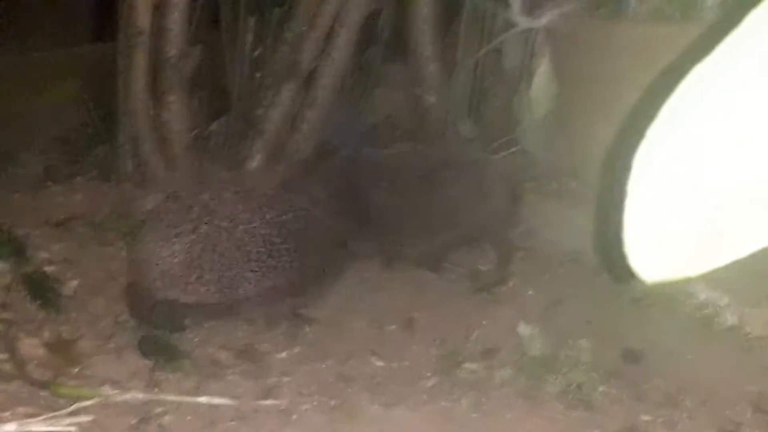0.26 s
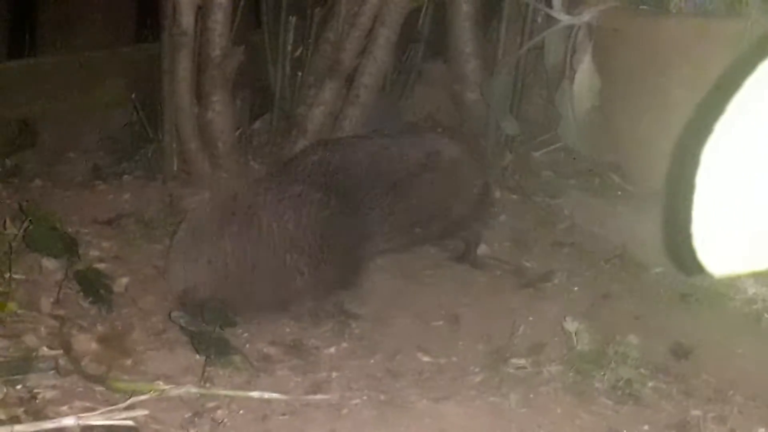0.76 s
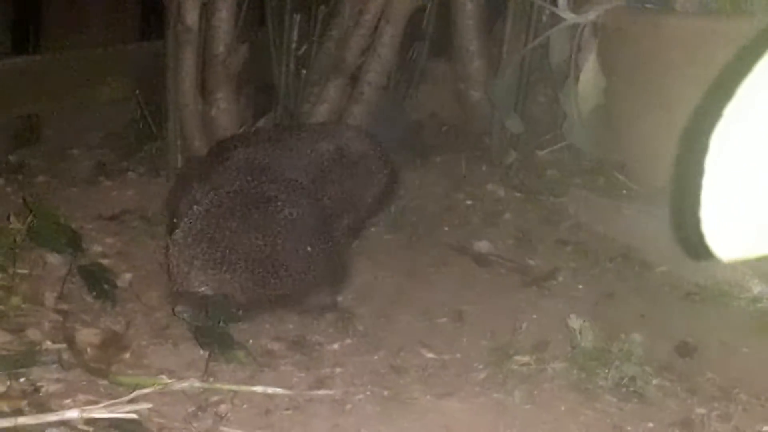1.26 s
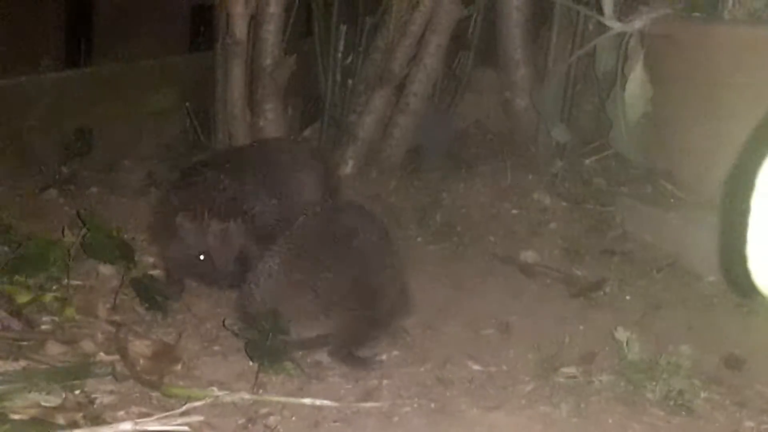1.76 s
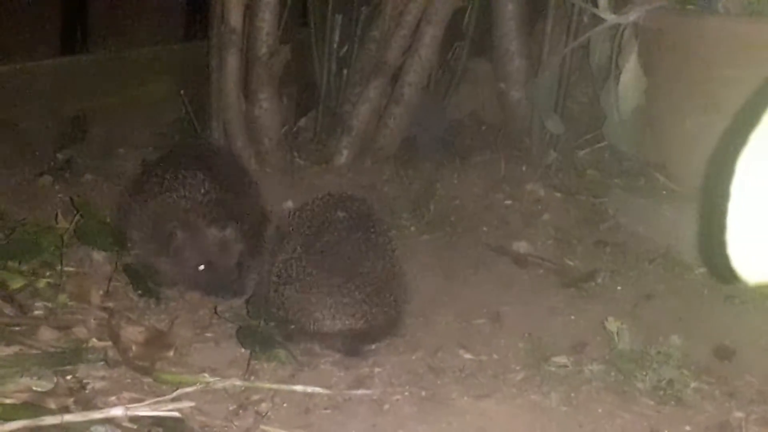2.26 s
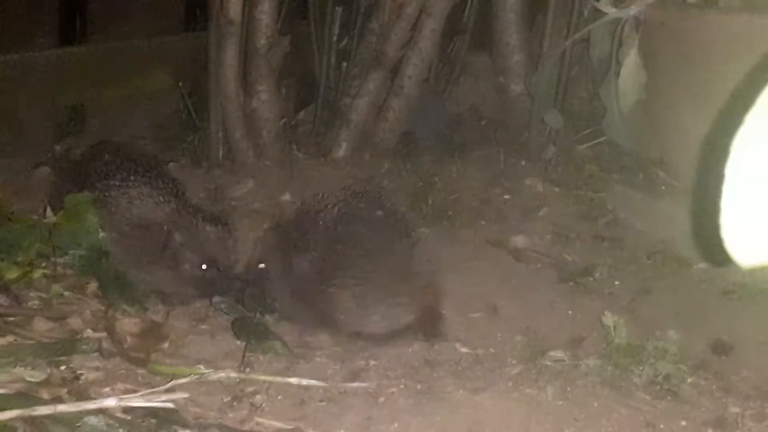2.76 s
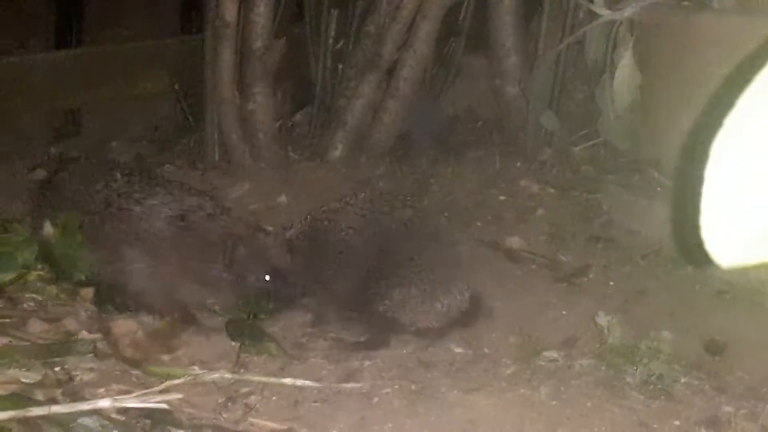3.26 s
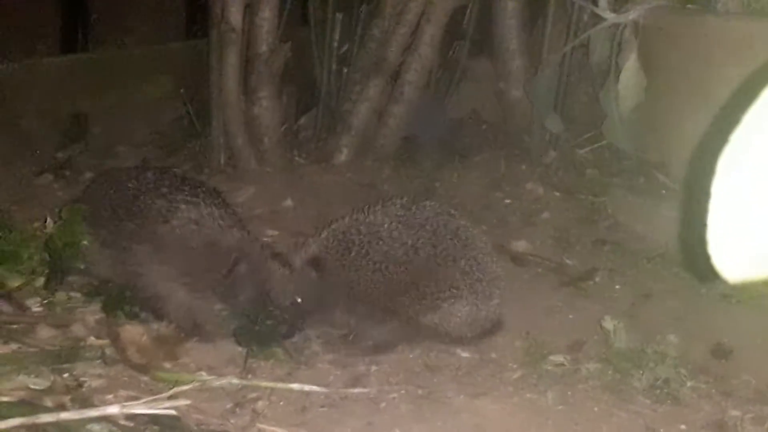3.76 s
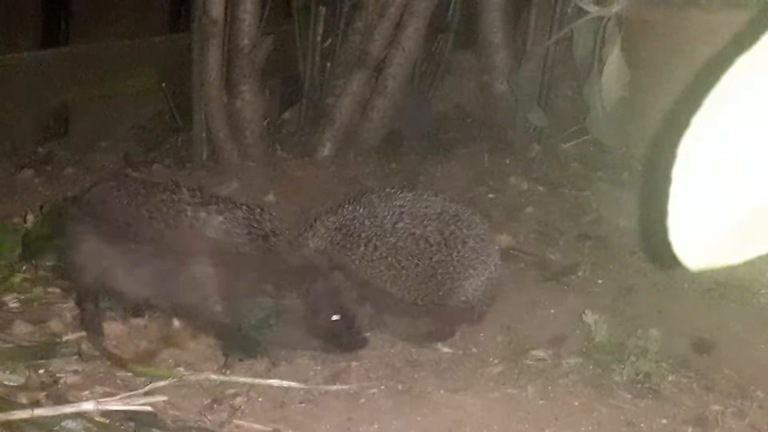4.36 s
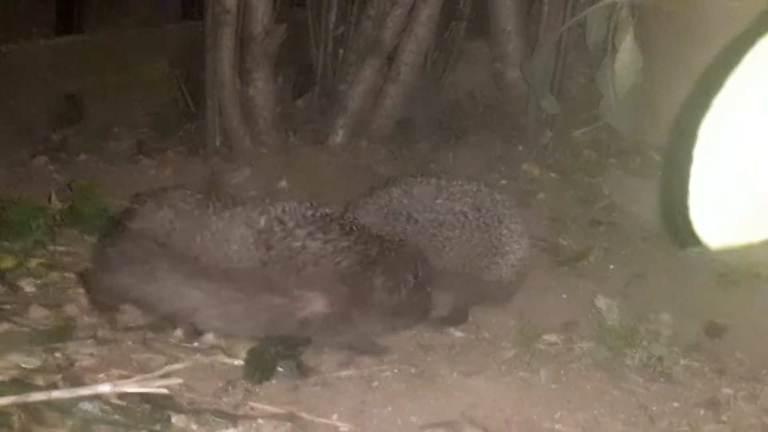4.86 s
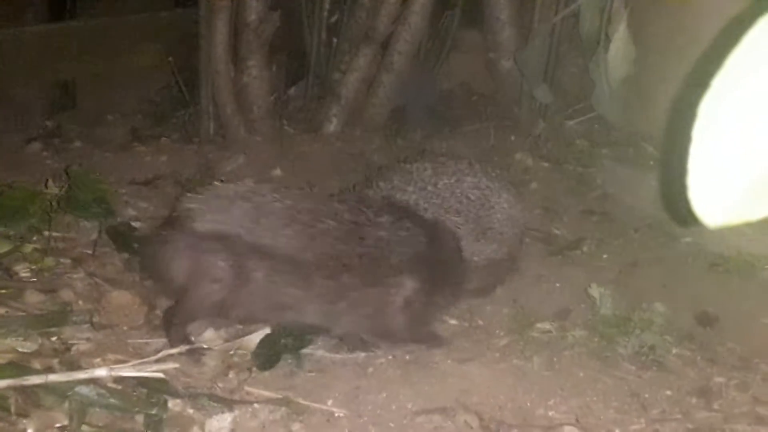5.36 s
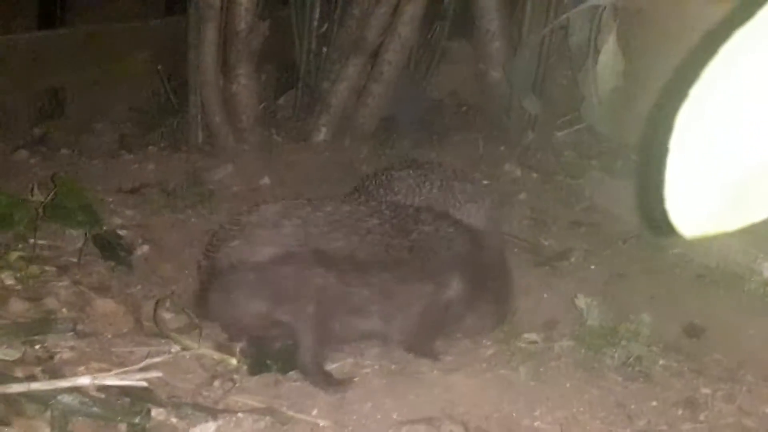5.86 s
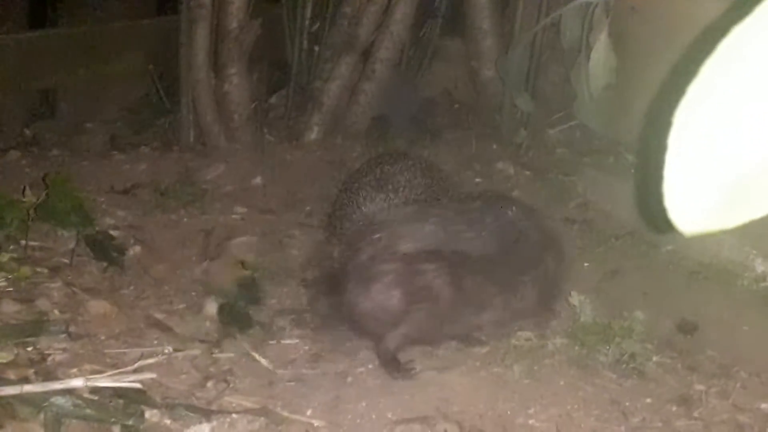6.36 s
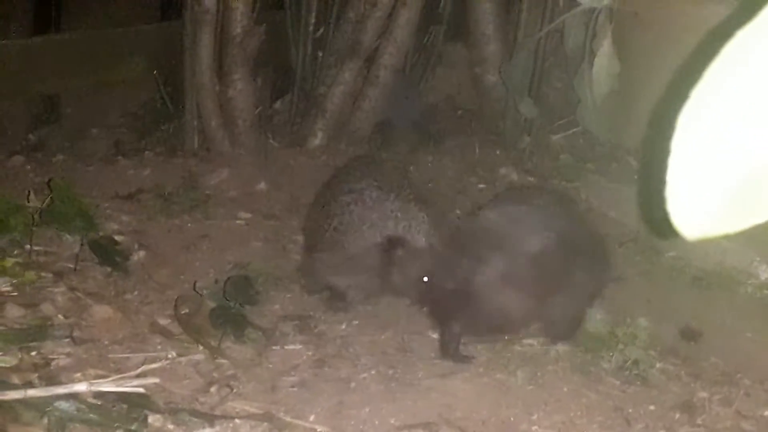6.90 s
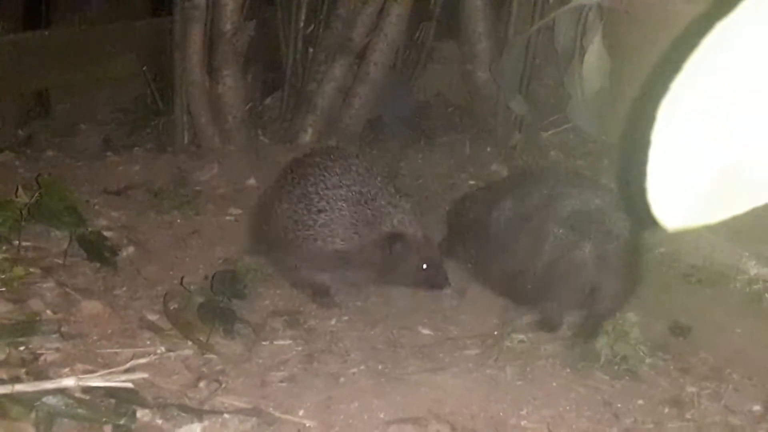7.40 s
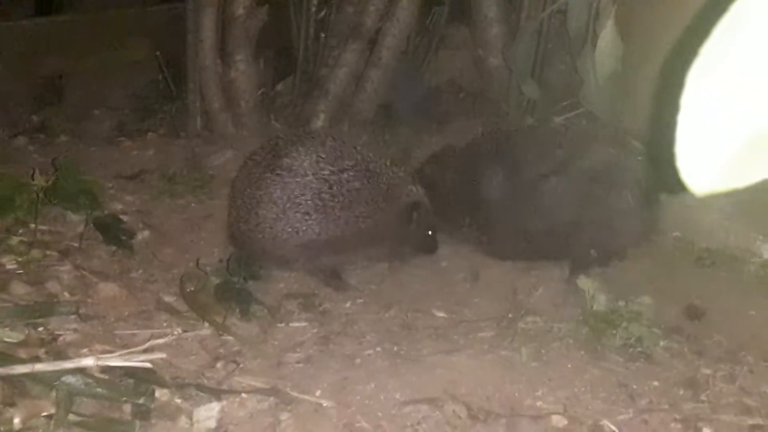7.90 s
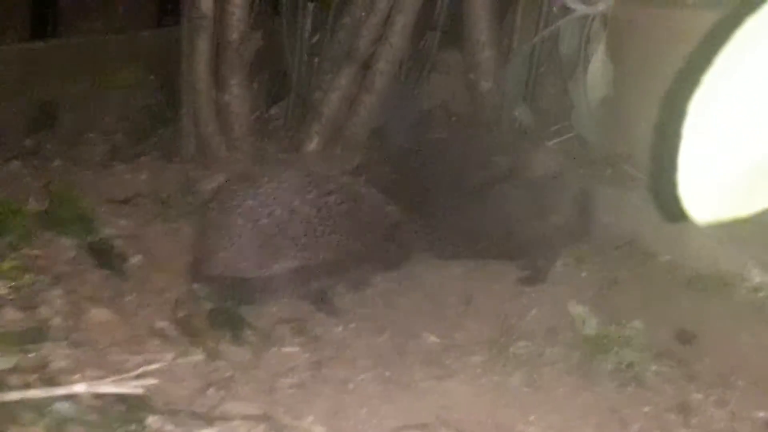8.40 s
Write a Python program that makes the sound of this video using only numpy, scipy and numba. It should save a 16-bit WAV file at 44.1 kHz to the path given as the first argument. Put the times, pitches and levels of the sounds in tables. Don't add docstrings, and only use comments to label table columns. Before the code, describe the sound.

Outdoors in a garden at night, a hedgehog about a metre from a small microphone huffs throughout, roughly three times a second. Each huff is a short burst of forced nasal air, bright and hissy around a rasping centre, with a little chesty body and a soft swell and fall. Faint leaf crackles trail the puffs. A small snap and dull pushes come near 0.7-0.8 s, and a low bump at 1.4 s. Around 3.3 s leaves rustle and twigs snap crisply. Faint whistling in-breaths appear near 3 s and 5-5.3 s. From 5.2 s the shuffling thickens, with the sharpest crack at 5.7 s. Huffs are stronger from about 6.7 s, with a light rustle near 7.9 s, and continue to the end at about 8.6 s. Far traffic rumble, a low drone and steady faint hiss lie beneath.

```python
import sys
import numpy as np
from scipy import signal
from scipy.fft import rfft, irfft
from scipy.io import wavfile
from scipy.ndimage import uniform_filter1d
from numba import njit

SR = 44100
rng = np.random.default_rng(int(sys.argv[2]) if len(sys.argv) > 2 else 0)


def linear_from_db(decibels):
    return 10 ** (np.asarray(decibels, float) / 20)


def digitize_waveform(pressure):
    field = np.atleast_2d(pressure).T
    bounded = np.clip(field, -1, 1)
    quanta = np.round(bounded * 32767).astype(np.int16)
    wavfile.write(sys.argv[1], SR, quanta)


N = 381024

# f/Hz, density/dB
TRAFFIC_SPECTRUM = [(13, -56), (22, -37), (35, -29), (49, -9), (92, -6.5), (125, -4.5), (157, -1.5),
                    (233, 0.5), (276, -4.5), (366, -5.5), (426, -14), (576, -8), (645, -8.5), (1050, -11),
                    (2000, -45.5), (2600, -84), (4400, -120)]
# t/s, level/dB
TRAFFIC_SWELL = [(0, 1), (.74, 0), (.98, -2), (1.4, 1), (2.2, -2.5), (4.9, 1), (5.4, -1), (6.7, 1.5),
                 (8.64, -1)]
# t/s, level/dB
LORRY_LEVEL = [(0, -71), (3.6, -73.5), (4.3, -63.5), (6.5, -57.5), (7.2, -99), (8.64, -59)]
# f/Hz, width/Hz, level/dB
FAN_TONES = [(62.1, 18, -67.5), (121.8, 9, -68), (243.5, 12.4, -65.5), (363.5, 8, -69)]
# t/s, level/dB, rise/(dB/s), fall/(dB/s)
LEAF_SHUFFLES = [(.002, -66.5, 900, 600), (.05, -76, 500, 50), (.785, -66, 900, 240), (2.886, -73, 300, 50),
                 (3.064, -78, 150, 70), (3.296, -54.5, 700, 900), (3.388, -67.5, 120, 700),
                 (3.62, -67, 500, 240), (4.288, -71, 70, 300), (4.352, -76, 150, 500),
                 (4.912, -83, 300, 60), (5.01, -76, 500, 500), (5.11, -70, 500, 100), (5.2, -66, 800, 550),
                 (5.33, -71, 70, 296), (5.51, -60, 90, 400), (5.548, -62, 400, 550),
                 (5.7, -44.5, 2000, 1500), (5.739, -57.5, 1500, 390), (6.27, -73.5, 500, 102),
                 (7.825, -59.5, 800, 500), (7.937, -78, 100, 650), (8.003, -85, 250, 350),
                 (8.231, -77, 900, 600), (8.525, -76, 500, 100)]
# f/Hz, density/dB
LEAF_SPECTRUM = [(940, -60), (1600, -11), (2260, -12.5), (2580, -14), (3040, -9), (3790, -16.5),
                 (4630, -15), (5150, -10.5), (7480, -30), (15800, -34)]
# t/s, peak/dB, ring f/Hz, treble share/dB, scatter share/dB
TWIG_SNAPS = [(0.044, -51, 3670, -23, -3), (0.3815, -63, 3920, -15, -18), (0.791, -45, 3950, -29, -9),
              (3.2864, -41, 3770, -24, -16), (3.2953, -39, 4000, -27, -20), (3.351, -47.5, 3800, -29, -14),
              (3.3827, -55, 3540, -21, -14), (3.6651, -59, 3590, -18, -18), (4.2543, -48.5, 3780, -22, -13),
              (5.198, -49, 3500, -27, -20), (5.446, -45, 3900, -31, -21), (5.4594, -46, 3910, -36, -21),
              (5.4765, -44, 3580, -31, -22), (5.51, -40, 3680, -29, -24), (5.691, -31.5, 3730, -16, -1),
              (5.6959, -31.5, 4460, -2, -10), (5.7402, -38, 3830, -26, -12), (7.889, -58, 3850, -15, -18),
              (7.9179, -57, 3740, -14, -18), (7.998, -62, 4070, -16, -18)]
# t/s, length/s, peak airflow/dB, crest place/(0-1)
HUFF_EVENTS = [(0.148, 0.13, -48.5, 0.39), (0.442, 0.112, -54, 0.56), (0.671, 0.08, -46, 0.52),
               (0.988, 0.12, -47.5, 0.48), (1.328, 0.12, -46.5, 0.43), (1.681, 0.12, -47.1, 0.52),
               (2.007, 0.1, -50, 0.46), (2.373, 0.11, -49.4, 0.55), (2.747, 0.11, -47.5, 0.6),
               (3.142, 0.128, -51.5, 0.51), (3.469, 0.12, -43.5, 0.58), (3.797, 0.123, -47, 0.46),
               (4.094, 0.089, -45.5, 0.54), (4.42, 0.078, -51.5, 0.56), (4.647, 0.11, -50.5, 0.6),
               (5.015, 0.083, -52.5, 0.66), (5.327, 0.11, -51, 0.44), (5.602, 0.088, -45, 0.58),
               (5.857, 0.093, -49.6, 0.46), (6.158, 0.092, -48.5, 0.58), (6.462, 0.087, -46.5, 0.52),
               (6.731, 0.11, -42.5, 0.51), (7.07, 0.11, -44.5, 0.44), (7.376, 0.1, -42, 0.41),
               (7.695, 0.11, -43.5, 0.46), (8.051, 0.11, -46.5, 0.46), (8.393, 0.11, -43, 0.56)]
# t/s, nostril f/Hz, facing camera/dB, nasal level/dB
HEAD_POSE = [(.15, 3950, 6.5, -15.5), (.46, 3700, 3, -14), (1.33, 3850, -1.5, -12.5), (1.7, 3780, -4, -22),
             (2.0, 3340, -7, -33), (2.38, 3700, -1, -32), (2.76, 3540, -8, -34), (3.15, 3430, -4, -24),
             (3.47, 3700, -3.5, -24), (3.8, 3380, -0.5, -23.5), (4.42, 3480, -1, -16), (5.03, 3550, 3, -12),
             (5.5, 3920, 4, -18), (6.46, 3700, 3, -16), (7.4, 3800, 3.5, -27.5), (7.7, 3960, 4, -26),
             (8.05, 3700, 8, -30), (8.4, 3960, 4.5, -23)]
# f/Hz, density/dB
JET_SPECTRUM = [(1400, -70), (2400, -38), (2620, -17), (2780, -3.5), (3200, -2.5), (3700, -3.5),
                (4100, -2.5), (4600, -5), (5000, -8), (5350, -31.5), (6500, -28), (9000, -45), (16000, -63)]
# f/Hz, width/Hz, level/dB
NASAL_MODES = [(1930, 300, 5), (2270, 380, 6), (2560, 260, 2)]
# f/Hz, width/Hz, level/dB
CHEST_MODES = [(258, 270, 4.5), (457, 180, 11.5), (790, 63, 10), (883, 385, 14.5), (1097, 84, 6)]
# f/Hz, width/Hz, level/dB
WHISTLE_MODES = [(5385, 350, 6.5), (5760, 890, 3.5), (7120, 450, -18)]
# f/Hz, width/Hz, level/dB
FINE_MODES = [(12400, 10000, -9), (13800, 1800, -11), (15300, 1200, -3)]
# t/s, peak/dB, f/Hz, length/cycles
PRESSURE_THUDS = [
    (1.3935, -39, 125, .45),
    (5.68, -52, 80, .5),
    (5.0205, -50, 1350, 1.3),
    (.6915, -35, 800, .55),
    (.7035, -38, 750, .55),
]
# t/s, f/Hz, level/dB, rise/(dB/s), fall/(dB/s)
INDRAWN_WHISTLES = [
    (2.935, 3600, -72, 900, 300),
    (3.1, 3950, -75, 60, 250),
    (4.93, 4550, -79, 120, 150),
    (5.26, 3350, -66, 90, 60),
    (5.31, 3950, -67, 70, 250),
]
# t/s, level/dB, rise/(dB/s), fall/(dB/s)
SPINE_BRUSHES = [
    (3.295, -78, 400, 400),
    (3.56, -71.5, 200, 180),
    (5.055, -79, 280, 260),
    (5.75, -74, 44, 300),
]
# f/Hz, density/dB
HISS_MID_SPECTRUM = [(900, -25.5), (1500, -6), (2100, -3.5), (3300, -7), (4600, -6.5), (6000, -10),
                     (9000, -13), (12000, -9.5), (14000, -7.5), (15200, -8), (16500, -7.5)]
# f/Hz, density/dB
HISS_SIDE_SPECTRUM = [(900, -39), (1800, -11), (4200, -4.5), (6400, -8.5), (14600, -7.5), (16500, -6.5)]


def level(x, db):
    return x * linear_from_db(db) / np.sqrt(np.mean(x ** 2))


def noise():
    return rng.standard_normal(N)


def colour(x, spectrum):
    hz, db = np.transpose(spectrum)
    grid_hz = np.linspace(1, SR / 2, 4097)
    log_gain = np.log(linear_from_db(np.interp(np.log(grid_hz), np.log(hz), db)))
    cepstrum = irfft(log_gain)
    cepstrum[1:4096] *= 2
    cepstrum[4097:] = 0
    impulse = irfft(np.exp(rfft(cepstrum)))
    return signal.fftconvolve(x, impulse)[:N]


@njit
def svf(x, hz, width_hz):
    y, b, l = np.empty(len(x)), 0., 0.
    for i in range(len(x)):
        g, k = np.tan(np.pi * hz[i] / SR), width_hz / hz[i]
        v = (b + g * (x[i] - l)) / (1 + g * (g + k))
        b, l, y[i] = 2 * v - b, l + 2 * g * v, k * v
    return y


def band(x, hz, width_hz):
    hz = hz + np.zeros(N)
    once = svf(x, hz, 1. * width_hz)
    return svf(once, hz, 1. * width_hz)


def resonate(x, modes, db):
    ringing = sum(linear_from_db(gain_db) * band(x, hz, width_hz) for hz, width_hz, gain_db in modes)
    return linear_from_db(db) * level(ringing, 0)


def walk(rate_hz):
    hold = int(SR / rate_hz)
    steps = np.repeat(rng.standard_normal(N // hold + 1), hold)
    return 1.3 * uniform_filter1d(uniform_filter1d(steps, hold), hold)[:N]


def bumps_db(rows):
    now = np.arange(N) / SR
    slopes = [db - np.where(now < s, rise, -fall) * (s - now) for s, db, rise, fall in rows]
    return np.max(slopes, axis=0)


def background():
    now = np.arange(N) / SR
    rumble_db, roar_db, roar_swell_share = -58.5, -59, 0.57
    lorry_hz, lorry_width_hz = 144.1, 9.8
    swell_db = np.interp(now, *np.transpose(TRAFFIC_SWELL))
    road = colour(noise(), TRAFFIC_SPECTRUM)
    rumble = signal.sosfiltfilt(signal.butter(2, 400, fs=SR, output="sos"), road)
    traffic = linear_from_db(rumble_db + swell_db + .7 * walk(6)) * level(rumble, 2.5)
    traffic += linear_from_db(roar_db + roar_swell_share * swell_db + .6 * walk(9)) * level(road - rumble, 1.1)
    lorry_db = np.interp(now, *np.transpose(LORRY_LEVEL))
    lorry = linear_from_db(lorry_db) * level(band(noise(), lorry_hz, lorry_width_hz), 0)
    fan = sum(level(band(noise(), hz, width_hz), db) for hz, width_hz, db in FAN_TONES)
    return traffic + lorry + fan


def leaves():
    jerk_db, jerk_rise_db_per_s, jerk_fall_db_per_s = -27.5, 900, 220
    cracks_per_s, leaf_hz, leaf_width_hz = 2500, 3850, 1000
    jerks = [(s + length_s, db + jerk_db, jerk_rise_db_per_s, jerk_fall_db_per_s)
             for s, length_s, db, _ in HUFF_EVENTS]
    size = linear_from_db(3.2 * np.minimum(rng.exponential(size=N), 3.5))
    cracks = (rng.random(N) < cracks_per_s / SR) * size * noise()
    cracks = level(cracks, 0) + 0.49 * noise()
    ringing = .3 * cracks + 1.6 * band(cracks, leaf_hz, leaf_width_hz)
    return linear_from_db(bumps_db([*LEAF_SHUFFLES, *jerks])) * level(colour(ringing, LEAF_SPECTRUM), 0)


def snaps():
    length = 4000
    out, t = np.zeros(N + length), np.arange(length) / SR
    chance = rng.standard_normal((len(TWIG_SNAPS), 2, length))
    low_sos = signal.butter(3, (2800, 6800), "bandpass", fs=SR, output="sos")
    high_sos = signal.butter(3, (12500, 16500), "bandpass", fs=SR, output="sos")
    shape = np.exp(-(t / .00038 - 1.6) ** 2)
    scatter = np.exp(-t / 0.0089) * np.clip(t / 0.0027, 0, 1)
    for (s, db, hz, treble_db, scatter_db), (low, high) in zip(TWIG_SNAPS, chance):
        tail = linear_from_db(scatter_db) * scatter
        body = shape * np.sin(2 * np.pi * hz * t) + 0.46 * tail * signal.sosfilt(low_sos, low)
        treble = 1.5 * shape * np.sin(2 * np.pi * 15000 * t)
        treble += 1.4 * tail * signal.sosfilt(high_sos, high)
        start = int(s * SR)
        out[start:start + length] += linear_from_db(db) * (body + linear_from_db(treble_db) * treble)
    return out[:N]


def huffs():
    roundness, breath_s = 2.66, 0.12
    usual_db, usual_hz = -47, 3700
    sink, bypass, nostril_width_hz = 0.054, 0.09, 1570
    now = np.arange(N) / SR

    rows = np.array(HUFF_EVENTS)
    index = np.clip(np.searchsorted(rows[:, 0] - .03, now) - 1, 0, None)
    start, length_s, peak_db, crest = rows[index].T
    part = np.clip((now - start) / length_s, 1e-5, 1 - 1e-5)
    rise = (part / crest) ** crest
    fall = ((1 - part) / (1 - crest)) ** (1 - crest)
    flow_db = peak_db + 20 * np.log10((rise * fall) ** roundness)
    age = np.clip((now - start) / breath_s - .5, -.6, .7)

    pose_s, *pose = np.transpose(HEAD_POSE)
    nostril_hz, facing_db, nasal_db = (np.interp(start, pose_s, column) for column in pose)
    effort_db = peak_db - usual_db
    chest_db = -4 - 5 * (nostril_hz - usual_hz) * 0.0013 - 0.16 * effort_db

    air = linear_from_db(1.2 * walk(260) + 0.74 * walk(45)) * noise()
    lift = band(air, nostril_hz * (1 - sink * age), nostril_width_hz)
    jet = level(colour(bypass * air + lift, JET_SPECTRUM), 0)
    nasal_air = signal.sosfilt(signal.butter(4, 1800, "high", fs=SR, output="sos"), air)
    nasal = resonate(nasal_air, NASAL_MODES, nasal_db + 12 * age + 2.0 * walk(40))
    puff = signal.sosfilt(signal.butter(6, 1280, fs=SR, output="sos"), linear_from_db(2.0 * walk(150)) * air)
    chest = resonate(puff, CHEST_MODES, chest_db + 3 * age)
    whistle = resonate(air, WHISTLE_MODES, -20.5 + facing_db + 6 * age)
    fine = resonate(air, FINE_MODES, -31.5 - .6 * effort_db)
    fast = linear_from_db(0.056 * (flow_db + 50.5)) * (whistle + fine)
    return linear_from_db(flow_db) * (jet + nasal + chest + fast)


def thuds():
    t = np.arange(N) / SR
    out = np.zeros(N)
    for s, db, hz, cycles in PRESSURE_THUDS:
        envelope = np.exp(-((t - s) * hz / cycles) ** 2)
        out -= linear_from_db(db) * envelope * np.sin(2 * np.pi * hz * (t - s) + 1)
    return out


def wheezes():
    width_hz, trim_db = 350, -2
    air = linear_from_db(2.5 * walk(70)) * noise()
    out = np.zeros(N)
    for s, hz, *shape in INDRAWN_WHISTLES:
        out += linear_from_db(trim_db + bumps_db([(s, *shape)])) * level(band(air, hz, width_hz), 0)
    return out


def brush():
    grains = linear_from_db(2.9 * walk(300)) * noise()
    return resonate(grains, FINE_MODES, bumps_db(SPINE_BRUSHES))


def hedge(x):
    t60_s, echo_db = 0.16, -11
    t = np.arange(SR // 4) / SR
    echo = rng.standard_normal(len(t)) * linear_from_db(-60 * t / t60_s) * np.clip(t / 0.0023, 0, 1)
    echo /= np.sqrt(np.sum(echo ** 2))
    return x + linear_from_db(echo_db) * signal.fftconvolve(x, echo)[:N]


def scene():
    animals = hedge(huffs() + leaves() + brush() + snaps())
    mono = animals + thuds() + background() + wheezes()
    return np.array([mono, mono])


def top_cut(x):
    return signal.sosfilt(signal.butter(12, 16620, fs=SR, output="sos"), x)


def record(dry):
    mid_db, side_db, top_hz = -73, -80, 15740
    mid = level(colour(noise(), HISS_MID_SPECTRUM), mid_db)
    side = level(colour(noise(), HISS_SIDE_SPECTRUM), side_db)
    hissing = dry + mid + side * np.array([[1], [-1]])
    cut = signal.ellip(8, .2, 40, top_hz, fs=SR, output="sos")
    return top_cut(signal.sosfiltfilt(cut, hissing))


dry = scene()
out = record(dry)
digitize_waveform(out)
```